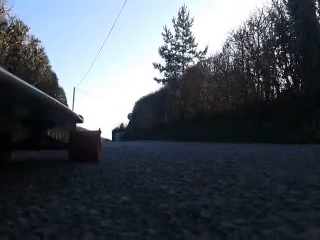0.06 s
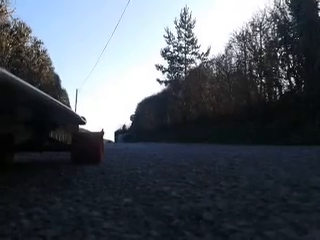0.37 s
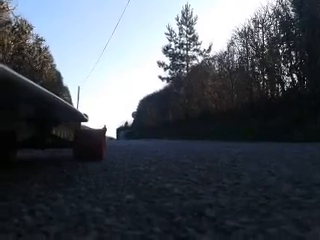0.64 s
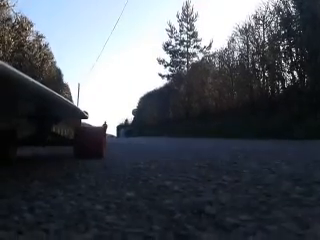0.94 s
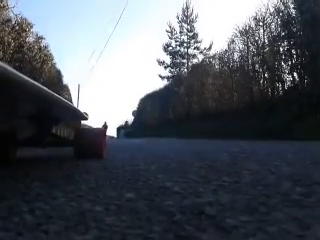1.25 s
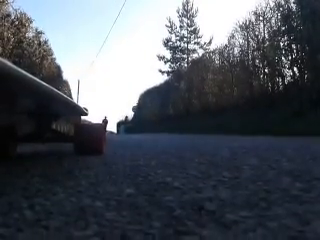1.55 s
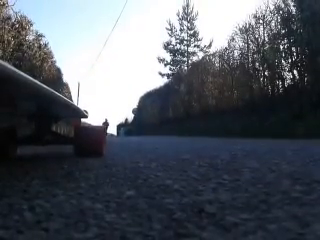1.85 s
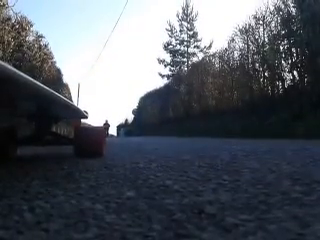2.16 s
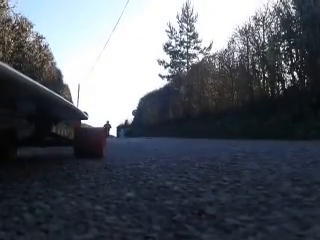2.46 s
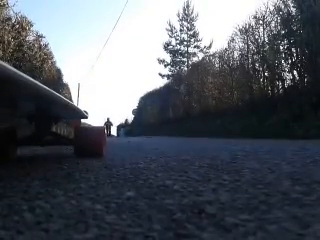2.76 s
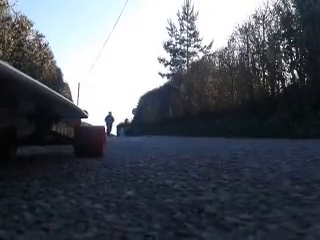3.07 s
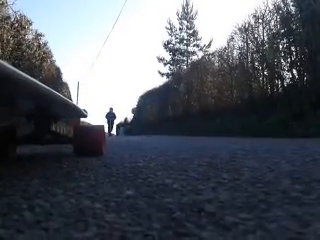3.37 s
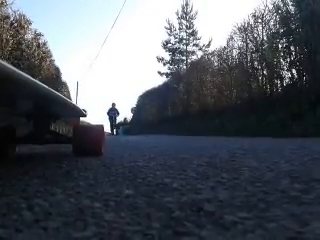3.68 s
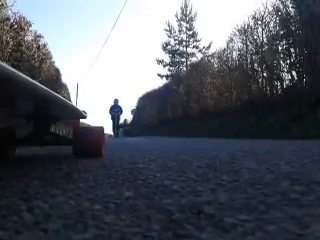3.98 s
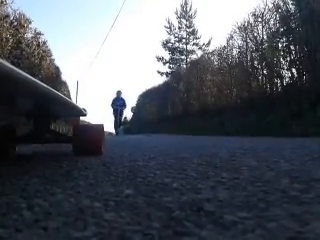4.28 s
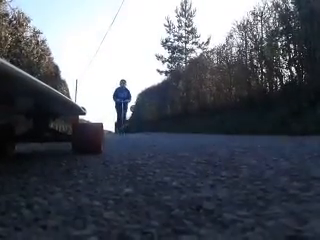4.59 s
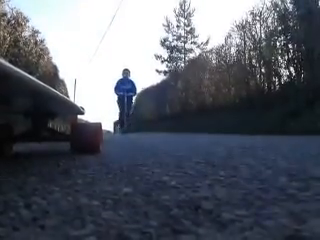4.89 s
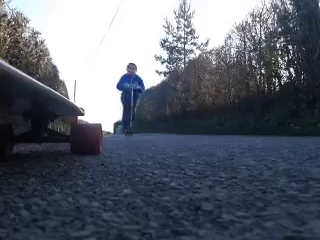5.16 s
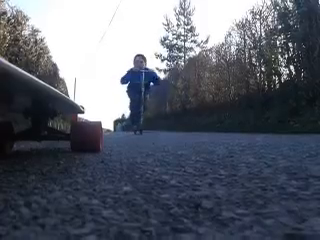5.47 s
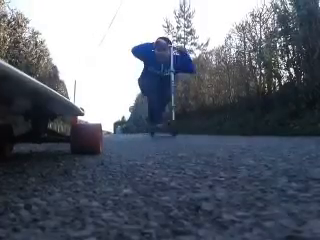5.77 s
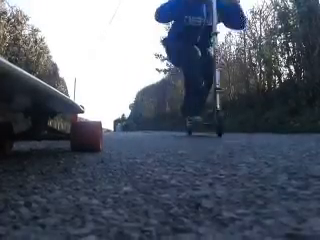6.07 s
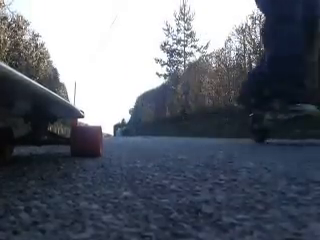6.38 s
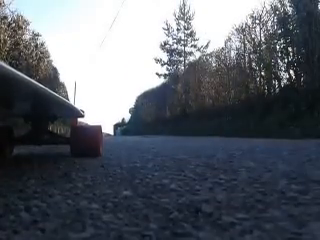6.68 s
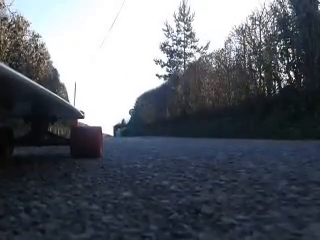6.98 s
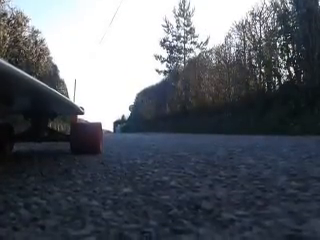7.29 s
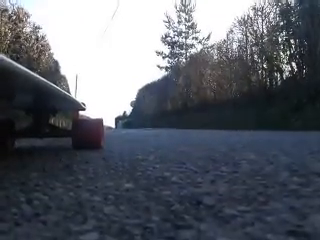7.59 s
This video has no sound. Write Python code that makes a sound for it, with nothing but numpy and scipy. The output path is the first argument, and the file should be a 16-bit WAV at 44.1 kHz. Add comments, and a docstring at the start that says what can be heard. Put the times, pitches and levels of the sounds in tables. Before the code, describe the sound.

Outdoors, heard from a microphone lying on the road, small wheels drum faintly over rough asphalt with scattered ringing metal clicks. A few soft gusts buffet the microphone as the kick scooter draws nearer. A wheel briefly scrapes and judders, then the scooter goes by very close in a burst of rolling noise and chattering metal, easing a little as it moves away.

```python
"""Kick scooter passing on coarse asphalt

A kick scooter rolls up and passes right beside a microphone lying on the ground. Stone tips drum
on its hard wheels and shake the loose metal frame, which clacks and rings at every larger bump.
A wheel judders in a swerve, and metal chatters as it goes by. Banks and trees add a short tail.
A light wind rumbles and pops on the microphone over a distant outdoor hush."""
import sys
import numpy as np
from scipy import signal
from scipy.fft import rfft, irfft, next_fast_len
from scipy.io import wavfile
from scipy.ndimage import uniform_filter1d, map_coordinates

SR = 44100
rng = np.random.default_rng(int(sys.argv[2]) if len(sys.argv) > 2 else 0)


def transcribe(u):
    """Save the signal u as a 16-bit wav file named by the first command-line argument.

    u: samples, shape (n,) or (channels, n), limited to [-1, 1]; the rate is SR.
    q: integer samples, one column per channel.
    """
    v = np.clip(np.atleast_2d(u).T, -1, 1)
    q = np.round(v * 32767).astype(np.int16)
    wavfile.write(sys.argv[1], SR, q)


N = 336924

# The rolling swells as the scooter nears. Each row: time in seconds, wheel roar and frame rattle in dB.
ROLL_LEVELS = [(0.0, -48, -56.5), (0.74, -51, -59), (0.91, -47, -53), (1.13, -46.5, -53.5),
               (1.85, -46.5, -53.5), (2.38, -44, -51.5), (2.81, -44.5, -50.5), (2.88, -39.5, -45.5),
               (3.18, -42.5, -48), (3.25, -40.5, -47.5), (3.4, -41, -45), (3.58, -44.5, -50),
               (3.79, -37.5, -49), (3.88, -41, -54), (3.95, -38, -45.5), (4.02, -40, -46.5),
               (4.23, -46, -47.5), (5.26, -45, -45.5), (5.7, -46, -48), (5.91, -39, -41),
               (6.02, -38, -40.5), (6.55, -35.5, -42.5), (6.59, -31.5, -37.5), (6.69, -30, -34),
               (6.74, -33, -36.5), (6.87, -29, -33), (7.08, -32, -35), (7.3, -33.5, -41.5),
               (7.47, -38, -42), (7.64, -39.5, -41)]
# Which side the scooter shows as it nears, swerves and goes by, which sets its tone.
# Each row: time in seconds, side (0 far, 1 near, 2 alongside, 3 turned away).
FACING = [(0, 0), (3.2, 0), (4.4, 1), (5.65, 1.5), (6.3, 3), (6.95, 2), (7.25, 3)]
# The larger bumps. Each row: time in seconds, frame ring, wheel thud and metal snap in dB, ping in Hz.
BUMPS = [(0.5667, -41, -42, -71, 2550), (0.874, -52, -41, -49, 2370), (1.0127, -33.5, -40, -61, 2510),
         (1.158, -35, -37.5, -63, 1540), (1.4472, -40, -36.5, -64, 2300), (1.5492, -33, -45, -54, 2230),
         (1.5962, -29.5, -42.5, -57, 2630), (1.723, -37, -33.5, -47, 2480), (1.9372, -41, -40, -41, 2700),
         (1.951, -36, -32, -50, 2620), (2.0233, -38, -35.5, -60, 2370), (2.126, -41, -41, -43, 2550),
         (2.149, -33.5, -32, -45, 2350), (2.172, -39, -32, -59, 1510), (2.217, -33, -31, -44, 2440),
         (2.524, -33, -29.5, -38, 2470), (2.551, -47, -33.5, -43, 2400), (3.002, -30.5, -39, -57, 2420),
         (3.081, -31.5, -46, -38, 2520), (3.222, -31.5, -25.5, -36, 2420), (3.236, -41, -33, -40, 2400),
         (3.251, -26.5, -37, -39, 2110), (3.2872, -34, -46, -51, 2340), (3.3397, -32.5, -32, -49, 2700),
         (3.355, -29.5, -32.5, -52, 2240), (3.412, -32, -33.5, -55, 2790), (3.4478, -34, -36, -50, 2800),
         (3.657, -54, -34.5, -59, 2260), (3.8137, -34, -31.5, -38, 2040), (3.842, -35.5, -33.5, -40, 1960),
         (3.9144, -27, -29, -35, 2740), (4.181, -40.5, -48, -31.5, 2720), (4.412, -31, -45, -57, 2420),
         (4.6096, -31, -41, -37.5, 2820), (4.631, -37.5, -46, -48, 2750), (4.721, -42, -54, -43, 2700),
         (4.7549, -28, -36, -26, 2280), (4.805, -39, -53, -38.5, 1940), (4.904, -39, -41, -38, 1790),
         (4.929, -36.5, -43, -40, 1860), (5.005, -44, -54, -37.5, 2620), (5.184, -27.5, -38, -29.5, 3340),
         (5.206, -32, -51, -32.5, 2660), (5.386, -27, -38, -42, 1850), (5.404, -31.5, -41, -48, 2610),
         (5.655, -29.5, -36.5, -39, 1840), (5.8514, -26, -35, -25.5, 3280),
         (6.063, -35.5, -47, -28.5, 1960), (6.119, -25, -31.5, -49, 1990), (6.3692, -32, -22, -37, 1800),
         (6.3969, -28.5, -26, -44, 2040), (6.419, -28, -31, -52, 1700), (6.4506, -29.5, -37, -46, 1990),
         (6.5642, -22, -25, -39, 1900), (6.5828, -21, -23.5, -27, 2110), (6.6043, -20, -24.5, -45, 2620),
         (6.614, -33, -33, -42, 2040), (6.628, -28, -24, -42, 1510), (6.6475, -24, -32.5, -46, 1700),
         (6.656, -22, -29, -39, 2110), (6.6707, -24, -33, -41, 1640), (6.679, -16.5, -25, -30, 1730),
         (6.713, -25.5, -33.5, -30.5, 2210), (6.751, -35, -33, -29, 2630), (6.8058, -24, -29, -27, 2090),
         (6.8425, -22.5, -24, -46.5, 2300), (6.8491, -22, -19.5, -44, 1680), (6.857, -15.5, -24, -42, 1980),
         (6.88, -27, -23, -45, 2020), (6.9744, -25, -27, -15, 2780), (6.9997, -20.5, -34, -15.5, 2150),
         (7.035, -26.5, -27, -42, 2150), (7.106, -21.5, -30, -41, 2780), (7.1492, -14.5, -21.5, -26, 3240),
         (7.1969, -25, -32, -41, 2570), (7.2013, -22.5, -25.5, -33, 2500), (7.223, -34, -27.5, -29, 2570),
         (7.2409, -28.5, -28, -30, 2300), (7.2812, -29.5, -30, -46, 2780), (7.301, -30, -31, -46, 2700),
         (7.3692, -33, -31.5, -42, 2590), (7.3915, -30.5, -28, -42, 3280), (7.4194, -30.5, -33, -43, 2800),
         (7.4551, -26.5, -35, -51, 3250), (7.505, -27.5, -33, -37, 3310), (7.5352, -32, -38, -50, 2770),
         (7.5821, -31.5, -38, -39, 2770)]
# A clack's base decay time in seconds, one for each side; each layer shortens it by its own factor.
CLACK_DECAYS = [0.069, 0.15, 0.054, 0.068]


def wheels(jolts, bounces, roll_db=-1.5, thud_db=1):
    """Stone tips drum on the hard wheels; every bump adds a short thud and rings the hubs."""
    # The wheels' tone from each side. Each row: frequency in Hz, gain in dB.
    far = [(65, -57), (110, -41.5), (237, -24), (385, -21), (440, -8.5), (580, -9), (660, -14), (800, -6.5),
           (950, 0.5), (1085, 4), (1150, -4), (1230, -16.5), (1400, -15), (1670, -23), (2210, -58),
           (3740, -120)]
    near = [(76, -43), (130, -21.5), (331, -7), (404, -26), (750, -2.5), (890, 1), (1070, -4.5),
            (1230, -16.5), (1330, -17), (1400, -41), (1820, -37), (3080, -120)]
    alongside = [(65, -59.5), (110, -22.5), (270, -4.5), (381, -1), (522, 1.5), (740, 0.5), (900, 2.5),
                 (1130, 2.5), (1260, -11.5), (1600, -16.5), (2080, -23.5), (3520, -120)]
    away = [(65, -73), (110, -27.5), (279, -14), (380, -15.5), (467, -7), (650, -10.5), (760, -6),
            (900, -3), (1000, -4.5), (1120, -1), (1350, -9.5), (1600, -15.5), (2080, -20), (3520, -120)]
    # Hub resonances, sharpened below. Each row: frequency in Hz, width in Hz, gain in dB.
    hub_modes = [(1467, 130, -0.5), (1370, 84, -5.5)]
    # The hub ring fades as the scooter nears. Each row: time in seconds, gain in dB.
    hub_fade = [(0, -10), (1.7, -11), (2.2, -9), (2.6, -18.5), (3.2, -25), (4.4, -43)]
    roar_db, _ = curves(ROLL_LEVELS)
    times, _, slam_db = bounces
    slams = blows(times, slam_db, t60=0.03, rise=0.0012)
    tips = steady(patchy(grit(rate=8000, spread_db=2), depth_db=2.5), seconds=0.012)
    thuds = clacks(np.array(BUMPS)[:, 2] + thud_db, decay_scale=0.58)
    drive = np.hypot(amp(roar_db + roll_db) * jolts, slams) * tips + thuds
    hubs = ring(drive * amp(curves(hub_fade)[0]), resonances(hub_modes, low_hz=1220) ** 1.94)
    return hubs + by_side(drive, [shape(side) for side in (far, near, alongside, away)])


def stones(share=0.46, count=520):
    """Envelope of jolts from the larger stones over the even drumming of the small ones."""
    times = (np.arange(count) + 2 * rng.random(count) - 1) * N / SR / count
    jolts = steady(blows(times, np.zeros(count), t60=0.062, rise=0.0021), seconds=0.11)
    return np.sqrt(1 - share + share * jolts ** 2)


def frame(jolts, rattle_db=-2.5, clack_db=-6, snap_db=-0.5, treble_db=1):
    """The road's jolts shake the loose frame over a crunch of stone; clacks add a bright snap."""
    # Deck and fork resonances by side. Each row: frequency in Hz, width in Hz, gain in dB.
    far_modes = [(2386, 220, 8), (2740, 230, 0.5), (3160, 150, -14.5), (4390, 150, -6.5), (5400, 660, -8),
                 (6750, 180, -14.5)]
    near_modes = [(1855, 135, 6.5), (2580, 190, 3), (2775, 140, 2.5), (4780, 150, -8.5), (5630, 360, -8.5),
                  (6200, 150, -13), (6900, 190, -6)]
    away_modes = [(1846, 140, -4.5), (2100, 160, -1), (2620, 280, -1.5), (2780, 260, -1.5), (4100, 130, -9),
                  (4480, 130, -12), (4800, 84, -8), (5670, 170, -11), (6570, 1000, -13.5)]
    # The steering tube sings along with the rattle. Same columns.
    tube_mode = [(3285, 55, 0)]
    # How much of that singing comes through, in dB, one for each side.
    tube_mix = [-20, -10, -19.5, -9]
    # The tone of stone against wheel and of the metal snap. Each row: frequency in Hz, gain in dB.
    crunch_eq = [(880, -24), (1350, -3), (1700, 1.5), (2100, 1.5), (2450, -3.5), (2720, 0.5), (3660, -22),
                 (4120, -17.5), (5080, -20), (5700, -10.5), (7200, -13.5), (9360, -39), (15800, -120)]
    snap_eq = [(2500, -28.5), (3800, -5.5), (4700, -4), (5300, -2.5), (5900, 2), (6500, -2.5), (7000, 3.5),
               (7600, 0)]
    _, level_db = curves(ROLL_LEVELS)
    _, knocks_db, _, snaps_db, _ = np.transpose(BUMPS)
    contacts = steady(patchy(grit(rate=4000, spread_db=3), depth_db=6), seconds=0.027)
    dull, bright = [signal.sosfilt(signal.butter(3, 4000, kind, fs=SR, output="sos"), contacts)
                    for kind in ("low", "high")]
    shake = jolts * dull + amp(treble_db) * unit(jolts) * bright
    knocks = clacks(knocks_db + clack_db, decay_scale=0.61, tint_db=8.5)
    drive = amp(level_db + rattle_db) * shake + knocks
    crunch, singing = shape(crunch_eq), unit(resonances(tube_mode))
    far, near, away = [np.hypot(resonances(modes), amp(crunch_db) * crunch)
                       for modes, crunch_db in ((far_modes, -12), (near_modes, -15), (away_modes, -15))]
    sides = (far, near, crunch, away)  # from alongside, the crunch takes over
    colours = [np.hypot(unit(side), amp(db) * singing) for side, db in zip(sides, tube_mix)]
    snaps = clacks(snaps_db + snap_db, decay_scale=0.99, tint_db=4.5)
    return by_side(drive, colours) + ring(snaps, shape(snap_eq))


def clacks(levels_db, decay_scale, tint_db=0, blow_s=0.0094, blow_db=-4, rise=0.00067):
    """Each clack is a hard blow and a dying run of bounces, tinted anew because other parts touch."""
    out, t = np.zeros(N + SR), np.arange(SR // 6) / SR
    blow = (1 + amp(blow_db) * np.exp(-(t / blow_s) ** 2)) * (1 - np.exp(-t / rise))
    bands_hz = np.linspace(0, SR / 2, 48)
    for (s, *_), db in zip(BUMPS, levels_db):
        fade = amp(-60 * t / (heard_from(CLACK_DECAYS, s) * decay_scale))
        bounces = rng.standard_normal(len(t)) * fade * blow
        band_gains = amp(tint_db * np.tanh(rng.standard_normal(len(bands_hz))))
        tint = signal.firwin2(129, bands_hz, band_gains, fs=SR)
        burst = np.convolve(bounces, tint, "same")
        out[round(s * SR):][:len(t)] += amp(db) * burst * np.linalg.norm(fade) / np.linalg.norm(burst)
    return out[:N]


def pings(waver=0.018, decay_scale=0.9):
    """In each clack one loose part rings briefly at its own pitch."""
    # The ping's level against its clack in dB, one for each side.
    ping_mix = [-6, -8, -9, -5.5]
    out, t = np.zeros(N + SR), np.arange(SR // 6) / SR
    drift = wobble(500)
    for s, knock_db, _, _, hz in BUMPS:
        start, t60 = round(s * SR), decay_scale * heard_from(CLACK_DECAYS, s)
        tone = sine(hz * (1 + waver * np.resize(drift[start:], len(t))))
        out[start:][:len(t)] += amp(knock_db + heard_from(ping_mix, s) - 60 * t / t60) * tone
    return out[:N]


def steering_tube(scatter_db=0.5, waver=0.004, shake_db=3):
    """Every clack strikes the steering tube, whose ring is roughened by the shaking of the road."""
    # The tube's partials. Each row: frequency in Hz, level in dB, decay time in seconds.
    modes = [(2760, -4, 0.09), (3270, -5.5, 0.12), (5680, -17.5, 0.14)]
    # The ring's level against its clack in dB, one for each side.
    ring_mix = [-22, -11, -28, -4.5]
    out, t = np.zeros(N + SR), np.arange(SR // 5) / SR
    hz, mode_db, t60 = np.transpose(modes)[:, :, None]
    drift, shake = [np.pad([wobble(rate) for _ in modes], ((0, 0), (0, SR))) for rate in (260, 180)]
    for s, knock_db, *_ in BUMPS:
        span = round(s * SR) + np.arange(len(t))
        db = knock_db + heard_from(ring_mix, s) + mode_db + scatter_db * rng.standard_normal(hz.shape)
        envelope = amp(db + shake_db * np.tanh(shake[:, span]) - 60 * t / t60)
        out[span] += np.sum(envelope * sine(hz * (1 + waver * drift[:, span])), axis=0)
    return out[:N]


def pebbles(pitch_hz=2450, pitch_spread=0.12, spread_db=5, t60=0.012, crack_t60=0.0058, count=380):
    """Single stones flick the wheel rims: each cracks and rings briefly at a pitch of its own."""
    # The clearest flicks. Each row: time in seconds, level in dB, pitch in Hz.
    accents = [(1.0605, -36, 2320), (1.27, -32, 2530), (2.3196, -30, 2450), (2.3525, -36, 2410),
               (2.457, -37, 2600), (2.6433, -30.5, 2410), (2.6892, -40, 2400), (2.698, -27, 2500),
               (2.858, -29.5, 2430), (2.9466, -30, 2500), (3.1582, -26.5, 2310), (3.1856, -30, 2390),
               (3.264, -28, 2230), (3.326, -29, 2400), (6.3978, -23, 2000), (6.68, -14, 1740),
               (6.7515, -26, 2620), (7.1065, -15.5, 2780), (7.131, -23, 2780), (7.2025, -15.5, 2510)]
    # How far the other stones stand out of the rattle in dB, one for each side.
    pebble_mix = [9.2, 6, 5.7, 7.8]
    _, rattle_db = curves(ROLL_LEVELS)
    times = rng.random(count) * (N - 1) / SR
    pitch, size = np.clip(rng.standard_normal((count, 2)), -1.8, 1.8).T
    levels_db = rattle_db[(times * SR).astype(int)] + heard_from(pebble_mix, times) + spread_db * size
    scattered = np.transpose([times, levels_db, pitch_hz * np.exp(pitch_spread * pitch)])
    s, db, hz = np.vstack([accents, scattered]).T[:, :, None]
    t = np.arange(SR // 25) / SR
    tone = np.sin(2 * np.pi * hz * t) * amp(-60 * t / t60) * (1 - np.exp(-t / 0.00035))
    crack = amp(-7 - 60 * t / crack_t60) * rng.standard_normal(tone.shape)
    spans = (s * SR).astype(int) + np.arange(len(t))
    return np.bincount(spans.ravel(), (amp(db) * (tone + crack)).ravel(), N)[:N]


def metalwork(jolts, size=4096):
    """Frame, rims, loose parts and tube together, less the pitches the frame hardly radiates."""
    # The frame's dead spots. Each row: frequency in Hz, width in Hz, gain in dB.
    dead_spots = [(3044, 140, -1), (3780, 190, -2.5)]
    metal = frame(jolts) + pebbles() + pings() + steering_tube()
    return ring(metal, notches(dead_spots, np.fft.rfftfreq(size, 1 / SR)))


def hammering(scatter_s=0.0006):
    """Metal bounces almost evenly on metal: gives the times, metal dB and wheel thud dB."""
    # A light run, then a hard one.
    # Each row: start, length and bounce spacing in seconds, metal and wheel thud in dB.
    runs = [(6.903, .044, 0.00786, -11.5, -27), (6.9556, .011, 0.0038, -8, -13.5)]
    bounces = [(s, metal_db, thud_db) for start, length, gap, metal_db, thud_db in runs
               for s in np.arange(start, start + length, gap)]
    times, metal_db, thud_db = np.transpose(bounces)
    return times + scatter_s * np.resize(rng.standard_normal(32), len(times)), metal_db, thud_db


def chatter(bounces, gain_db=4):
    """Metal parts hammer together within reach of the microphone."""
    # The bright clash of metal. Each row: frequency in Hz, gain in dB.
    clash_eq = [(100, -43), (760, -12.5), (1300, 0), (1430, -7), (1650, -6.5), (2120, -2), (2440, -12.5),
                (2800, -3.5), (3890, -12), (5000, -4), (7200, -7.5), (9360, -2), (15800, -120)]
    times, metal_db, _ = bounces
    hits = blows(times, metal_db + gain_db, t60=0.024, rise=0.0018)
    return ring(hits * grit(rate=23000, spread_db=-2.5), shape(clash_eq))


def judder(pitch_hz=922, waver=0.02):
    """A wheel slips sideways in the swerve and rings at an unsteady pitch in short spurts."""
    # The slips. Each row: centre in seconds, level in dB, half length in seconds.
    slips = [(6.158, -30.5, 0.0085), (6.177, -29, 0.0057), (6.21, -27.5, 0.0084), (6.234, -26, 0.0037)]
    t = np.arange(N) / SR
    spurts = sum(amp(db) * np.exp(-0.5 * ((t - s) / half) ** 2) for s, db, half in slips)
    return spurts * unit(sine(pitch_hz * (1 + waver * wobble(250))))


def ticks(width_hz=1100, crack_db=13):
    """Each dry, close tick is one sharp crack and a little crumbling in a broad resonance."""
    # The ticks. Each row: time in seconds, level in dB, pitch in Hz.
    cues = [(0.875, -50, 6050), (1.54, -39, 4300), (1.554, -38, 3200), (1.5578, -26.5, 2700),
            (1.572, -36, 3400), (1.5796, -28, 3680), (1.5897, -31.5, 5960), (6.280, -37, 3750),
            (6.296, -36, 5500)]
    # The body all ticks share. Each row: frequency in Hz, width in Hz, gain in dB.
    body = [(2150, 780, -4.5), (1020, 600, 4.5)]
    out = np.zeros(N)
    for s, db, hz in cues:
        drive = blows([s], [0], t60=0.0076, rise=0.00036) * np.sign(rng.standard_normal(N))
        drive[round(s * SR)] += amp(crack_db)
        out += amp(db) * ring(drive, resonances([(hz, width_hz, 0)] + body, low_hz=700))
    return out


def scrapes():
    """Each scrape is a dense run of tiny slips in one broad, high resonance."""
    # Brief hisses. Each row: start and length in seconds, level in dB, centre and width in Hz.
    cues = [(0.602, 0.054, -62, 5970, 900), (0.88, 0.025, -52, 6300, 1600), (1.256, 0.19, -59, 4270, 698),
            (1.633, 0.15, -57.5, 4600, 900), (3.237, 0.14, -55, 4970, 2200),
            (3.721, 0.067, -51.5, 4400, 900), (3.915, 0.022, -44, 4800, 2490),
            (4.066, 0.05, -46.5, 5600, 2420), (5.844, 0.037, -41.5, 6640, 1610),
            (5.891, 0.049, -34.5, 6200, 2410), (6.148, 0.059, -41.5, 5940, 1200)]
    slips = grit(rate=2300, spread_db=1.5)
    out = np.zeros(N)
    for s, length, db, hz, width in cues:
        drive = swell(s, length, attack=0.01, release=0.016) * slips
        out += amp(db) * ring(drive, resonances([(hz, width, 0)]))
    return out


def reflection(x):
    """A nearby surface returns a lagging copy: a comb whose notches slide down during the pass."""
    # The reflected path grows longer. Each row: time in seconds, delay in ms, strength.
    echo = [(6.3, 2.8, 0), (6.55, 3.07, 0.37), (6.95, 3.83, 0.24), (7.3, 4.12, 0.15), (7.64, 4.2, .1)]
    delay_ms, strength = curves(echo)
    copy = map_coordinates(x, [np.arange(N) - delay_ms * SR / 1000], order=1)
    return (x + strength * copy) / np.sqrt(1 + strength ** 2)


def roadside_tail(x, t60=0.27, far_db=-10, step_db=-7):
    """Banks and trees scatter a short diffuse tail, weakest when the scooter is heard from alongside."""
    facing, = curves(FACING)
    side_on = 2 - np.abs(facing - 2)
    send = x * amp(far_db + step_db * side_on)
    t = np.arange(SR // 2) / SR
    tail = rng.standard_normal(len(t)) * amp(-60 * t / t60) * (1 - np.exp(-t / 0.006))
    return signal.oaconvolve(send, tail / np.linalg.norm(tail))[:N]


def wind(gust_db=-1, lumpy_db=7, heave_db=4):
    """Wind on the microphone: a low rumble, with a lumpy flutter in the gusts."""
    # The gusts. Each row: start and length in seconds, rumble and flutter in dB.
    gusts = [(0.567, 0.45, -46, -50.5), (1.4, 0.29, -46, -57), (3.374, 1.89, -46.5, -54),
             (3.612, 0.17, -43, -44), (3.82, 0.23, -54, -46.5), (4.06, 0.28, -44.5, -41.5),
             (4.42, 0.16, -51, -47.5), (5.507, 0.099, -45, -48), (5.78, 0.066, -43, -48)]
    # The light rumble between gusts, with one lull. Each row: time in seconds, level in dB.
    breeze = [(0, -55), (2.4, -55), (2.6, -66), (2.9, -63), (3.15, -53), (7.64, -56.5)]
    # The tone of rumble and flutter. Each row: frequency in Hz, gain in dB.
    rumble_eq = [(8, -6), (22, 0.5), (42, -3), (62, -7), (85, -17.5), (105, -40.5), (200, -63)]
    flutter_eq = [(95, -34.5), (135, -3.5), (220, -0.5), (330, -6.5), (500, -9), (850, -9), (1300, -39),
                  (2500, -74)]
    swells = np.array([swell(s, length, attack=0.022, release=0.074) for s, length, _, _ in gusts])
    push, stir = np.sqrt(amp(np.array(gusts)[:, 2:].T + gust_db) ** 2 @ swells ** 2)
    low_noise = steady(ring(rng.standard_normal(N), shape(rumble_eq)), seconds=0.25)
    buffets = np.tanh(wobble(45))  # each buffet heaves the rumble and stirs the flutter together
    rumble = np.hypot(amp(curves(breeze)[0]), push) * low_noise * unit(amp(heave_db * buffets))
    eddies = steady(amp(lumpy_db * buffets) * rng.standard_normal(N), seconds=0.1)
    return rumble + ring(stir * eddies, shape(flutter_eq))


def wind_pops():
    """The strongest eddies pop on the microphone port, each a cycle or two long."""
    # The eddies. Each row: centre in seconds, level in dB, pitch in Hz, half length in cycles.
    eddies = [(0.529, -36.5, 307, 0.37), (.622, -31.5, 227, 0.38), (.758, -38, 260, .6),
              (0.781, -37.5, 208, 0.6), (.924, -28.5, 460, 0.18), (1.021, -27.5, 440, 0.19),
              (1.626, -34, 244, 0.34), (1.691, -37, 170, 0.31), (3.618, -35.5, 300, 0.54),
              (3.637, -36, 330, .4), (3.689, -30.5, 373, 0.64), (3.704, -33, 420, .35),
              (3.714, -28, 300, 0.28), (3.751, -26.5, 288, 0.37), (3.835, -27, 400, 0.4),
              (3.8716, -13.5, 390, 0.29), (3.922, -27, 330, 0.37), (3.969, -29, 400, .4),
              (3.992, -17, 427, 0.25), (4.11, -27, 385, 0.43), (4.136, -30, 236, 0.52),
              (4.165, -24, 320, 0.61), (4.229, -27, 310, 0.54), (4.301, -26, 279, 0.5),
              (4.333, -26, 250, 0.38), (4.345, -24.5, 300, 0.33), (4.357, -21.5, 273, 0.32),
              (4.546, -27.5, 308, 0.96), (4.633, -33, 320, 0.34), (5.578, -27.5, 256, 0.32)]
    out, t = np.zeros(N), np.arange(N) / SR
    for (s, db, hz, cycles), phase in zip(eddies, rng.random(len(eddies))):
        span = np.abs(t - s) < 0.03
        turns = (t[span] - s) * hz
        out[span] += amp(db) * np.sin(2 * np.pi * (turns + phase)) / np.cosh(turns / cycles)
    return out


def outdoor_hush(level_db=-51.5):
    """A soft, even bed of distant outdoor noise."""
    # The tone of the hush. Each row: frequency in Hz, gain in dB.
    hush_eq = [(100, -20), (200, -9.5), (450, 3), (900, 0), (1800, -12), (4000, -19.5), (7000, -21.5)]
    return amp(level_db) * ring(rng.standard_normal(N), shape(hush_eq))


def by_side(drive, colours):
    """The scooter shows different sides as it comes and goes: crossfade their colours."""
    facing, = curves(FACING)
    return sum(ring(drive * np.sqrt(np.clip(1 - np.abs(facing - k), 0, 1)), colour)
               for k, colour in enumerate(colours))


def heard_from(values, s):
    """A value given for each side of the scooter, read for the side it shows at time s."""
    return np.interp(np.interp(s, *np.transpose(FACING)), np.arange(len(values)), values)


def grit(rate, spread_db):
    """Tiny contacts of random size, about rate a second, rms 1."""
    hit = rng.random(N) < rate / SR
    return unit(hit * np.sign(rng.standard_normal(N)) * amp(spread_db * rng.standard_normal(N)))


def patchy(x, depth_db, size=256):
    """From moment to moment other resonances are struck harder."""
    spectra = signal.stft(x, nperseg=size)[2]
    patches = uniform_filter1d(rng.standard_normal(spectra.shape), size=3, axis=0)
    patches = uniform_filter1d(patches, size=6, axis=1)
    return signal.istft(spectra * amp(depth_db * np.tanh(unit(patches))), nperseg=size)[1][:N]


def blows(times, levels_db, t60, rise):
    """Envelope of blows that start sharply and die away; their powers add."""
    power, t = np.zeros(N + SR), np.arange(SR // 4) / SR
    for s, db in zip(times, levels_db):
        power[max(round(s * SR), 0):][:len(t)] += (amp(db - 60 * t / t60) * (1 - np.exp(-t / rise))) ** 2
    return np.sqrt(power[:N])


def swell(start, length, attack, release):
    """Envelope that rises, holds and dies away."""
    t = np.arange(N) / SR - start
    return np.clip(t / attack, 0, 1) * np.exp(-np.maximum(t - length, 0) / release)


def ring(x, gain):
    """Pass x through a causal, unit-energy body with that gain per frequency."""
    cepstrum = irfft(np.log(np.maximum(gain, 1e-6)))
    half = len(cepstrum) // 2
    cepstrum[1:half] *= 2  # minimum phase: the ring follows the hit
    cepstrum[half + 1:] = 0
    response = irfft(np.exp(rfft(cepstrum)))
    return signal.oaconvolve(x, response / np.linalg.norm(response))[:N]


def resonances(modes, low_hz=1400, size=4096):
    """Gain per frequency of a set of modes; thin metal radiates no bass."""
    f = np.fft.rfftfreq(size, 1 / SR)
    power = sum(amp(db) ** 2 / (1 + (2 * (f - hz) / width) ** 2) for hz, width, db in modes)
    return np.sqrt(power * (1 - 1 / (1 + (f / low_hz) ** 10)))


def shape(points, size=4096):
    """Gain per frequency from (Hz, dB) points on a log axis."""
    hz, db = np.transpose(points)
    return amp(np.interp(np.log(np.fft.rfftfreq(size, 1 / SR) + 1), np.log(hz), db))


def notches(rows, hz):
    """Gain per frequency of a set of smooth dips."""
    return amp(sum(db * np.exp(-(2 * (hz - centre) / width) ** 2) for centre, width, db in rows))


def sine(hz):
    """A tone that follows a pitch curve."""
    return np.sin(2 * np.pi * np.cumsum(hz, axis=-1) / SR)


def curves(rows):
    """One value per sample for each column after the time."""
    s, *columns = np.transpose(rows)
    return [np.interp(np.arange(N) / SR, s, column) for column in columns]


def wobble(rate):
    """A smooth random curve, rate knots a second."""
    return map_coordinates(rng.standard_normal(int(N * rate / SR) + 4), [np.arange(N) * rate / SR])


def steady(x, seconds):
    """Keep the quick changes of x but hold its running rms at 1."""
    return x / np.sqrt(np.abs(uniform_filter1d(x ** 2, int(seconds * SR))) + 1e-9)


def unit(x):
    """Scale to rms 1."""
    return x / np.sqrt(np.mean(np.abs(x) ** 2) + 1e-20)


def amp(db):
    """Decibels to gain."""
    return 10 ** (np.asarray(db) / 20)


def scene():
    """The scooter and its roadside tail, ticks, scrapes, wind and hush, in mono."""
    jolts, bounces = stones(), hammering()
    scooter = metalwork(jolts) + reflection(wheels(jolts, bounces)) + chatter(bounces) + judder()
    foreground = scooter + roadside_tail(scooter) + ticks() + scrapes()
    return (foreground + wind() + wind_pops() + outdoor_hush())[None]


def record(dry, top_hz=7070):
    """The microphone has a narrow hole in its bass and cuts off steeply above its band limit."""
    # The hole in the bass. Each row: frequency in Hz, width in Hz, gain in dB.
    bass_hole = [(103, 16, -18)]
    size = next_fast_len(N + SR // 2)
    hz = np.fft.rfftfreq(size, 1 / SR)
    high_cut = 1 / np.sqrt(1 + (hz / top_hz) ** 74)
    return irfft(rfft(dry, size) * notches(bass_hole, hz) * high_cut, size)[:, :N]


dry = scene()
out = record(dry)
transcribe(out)
```